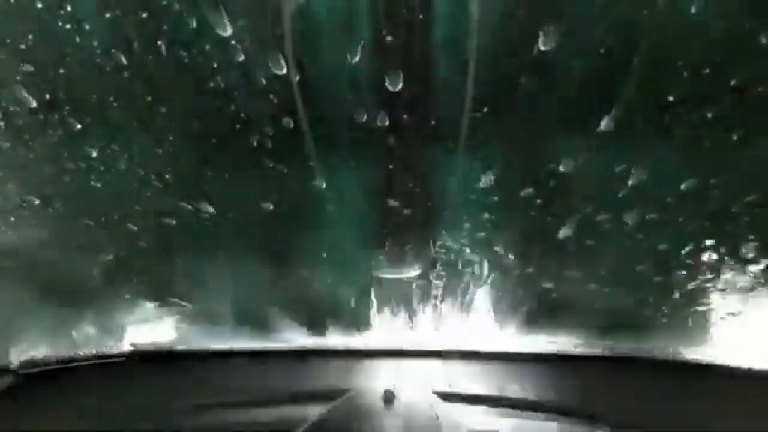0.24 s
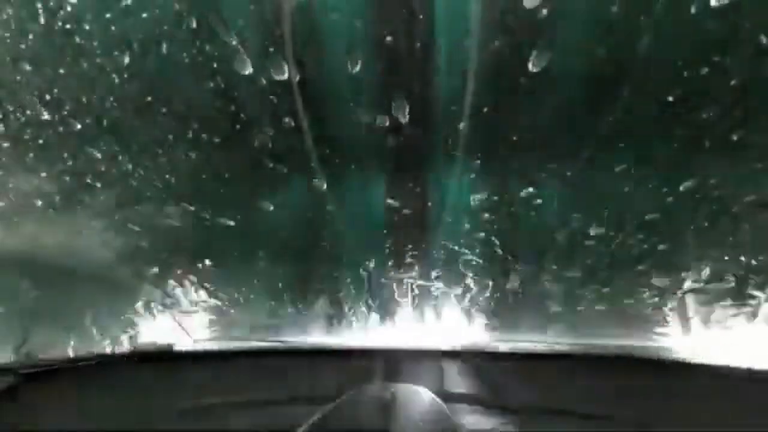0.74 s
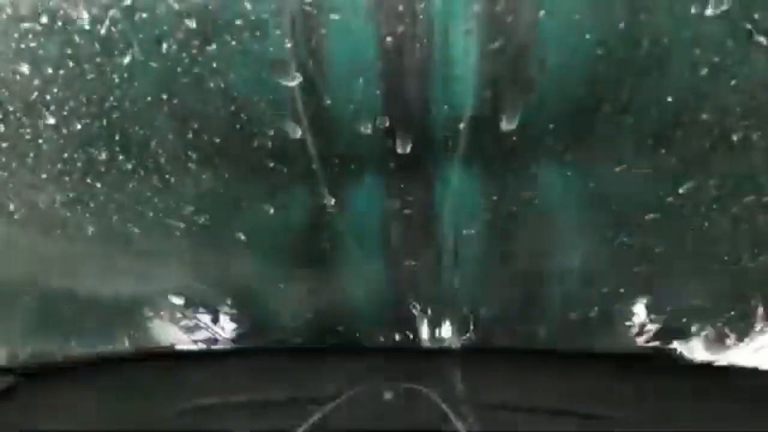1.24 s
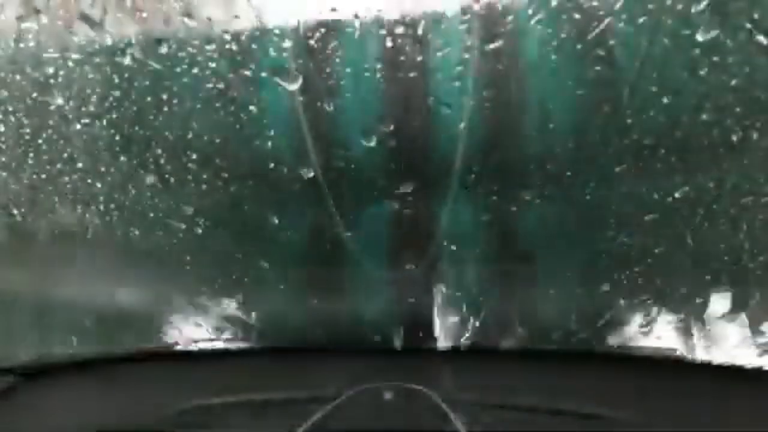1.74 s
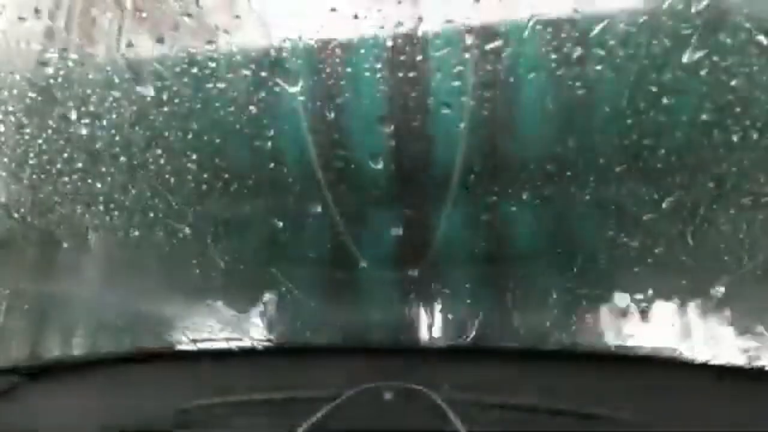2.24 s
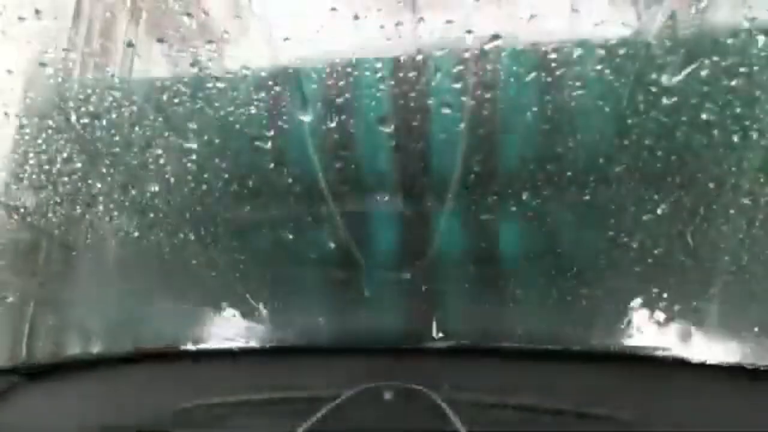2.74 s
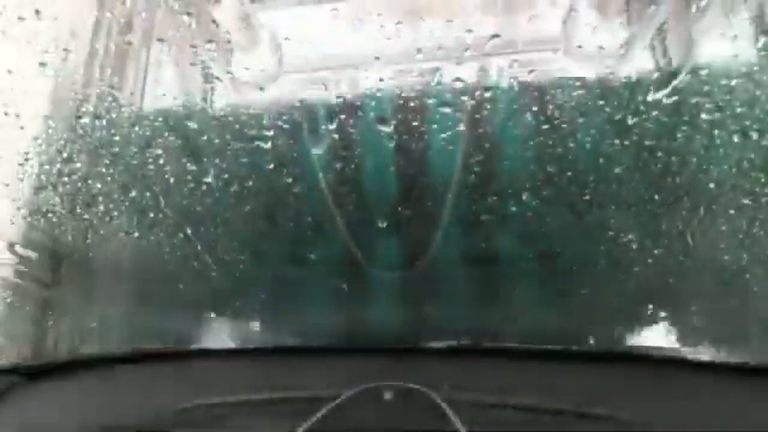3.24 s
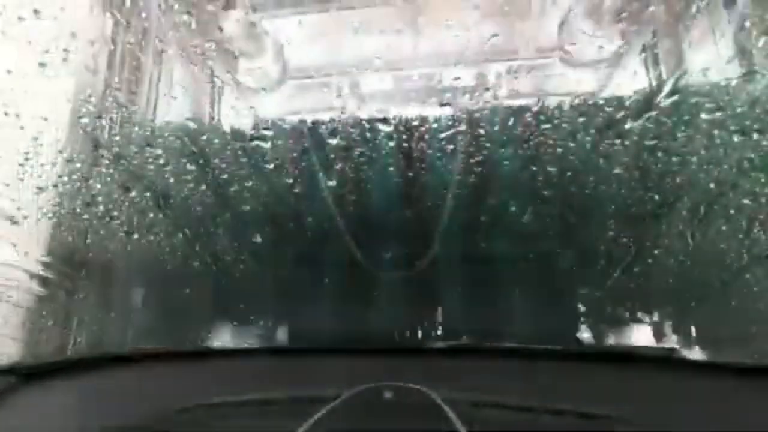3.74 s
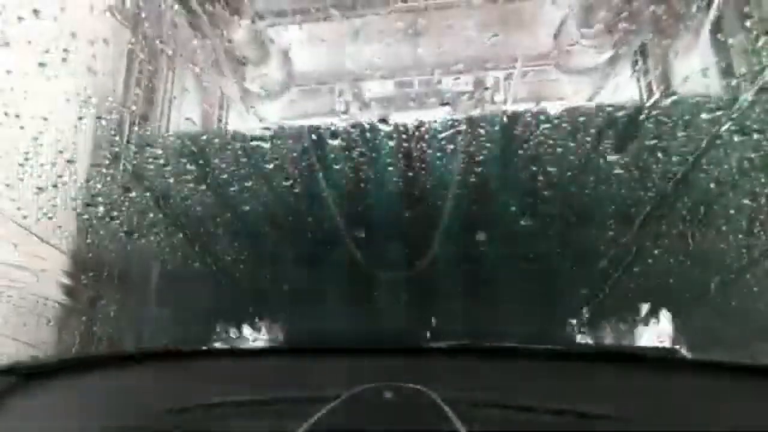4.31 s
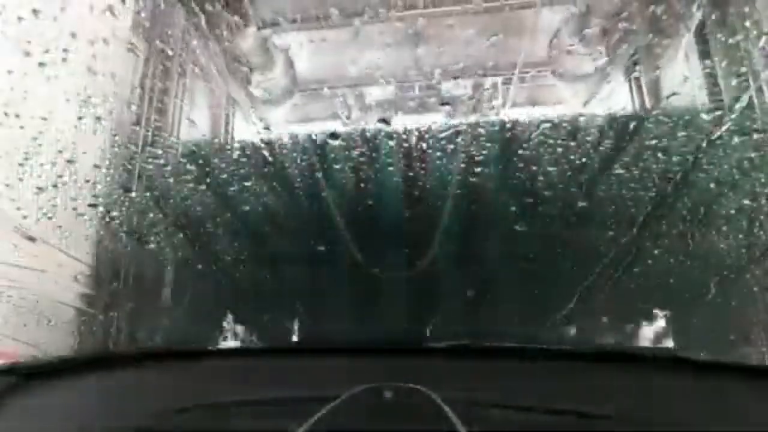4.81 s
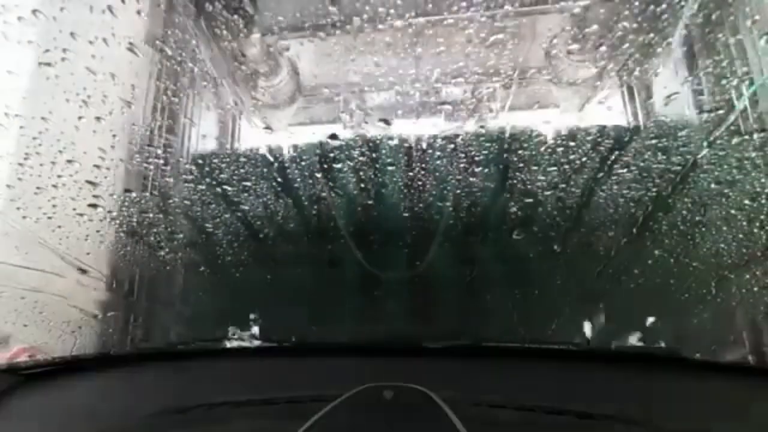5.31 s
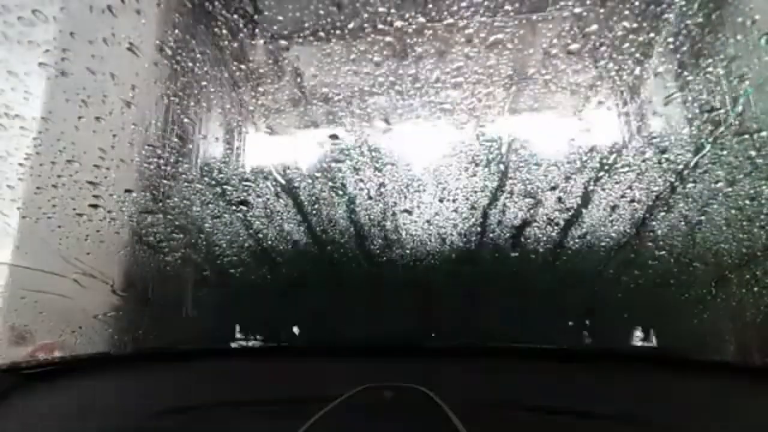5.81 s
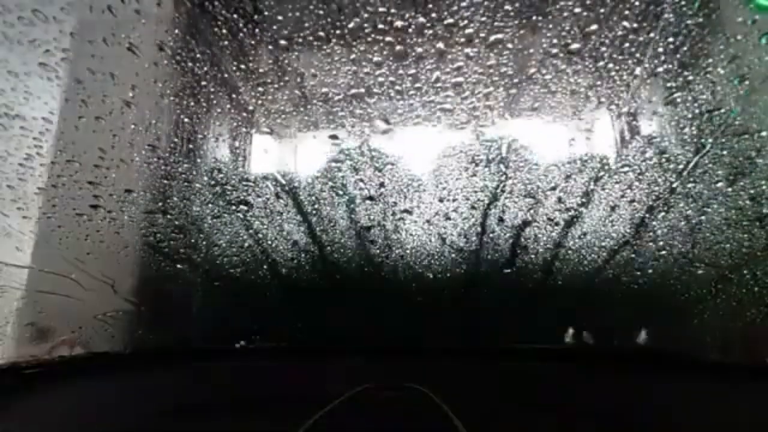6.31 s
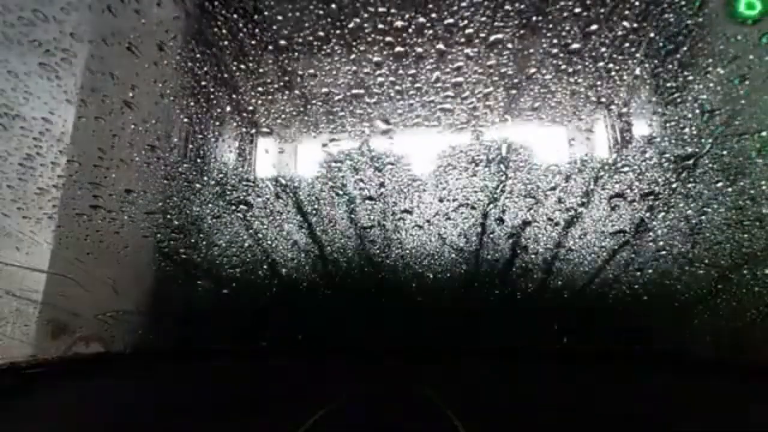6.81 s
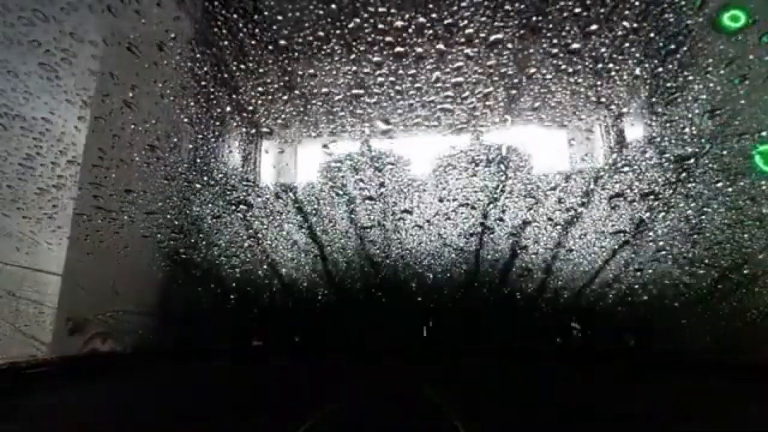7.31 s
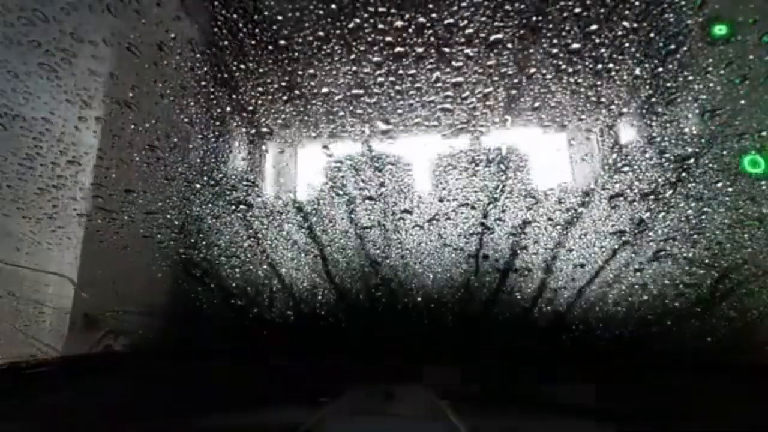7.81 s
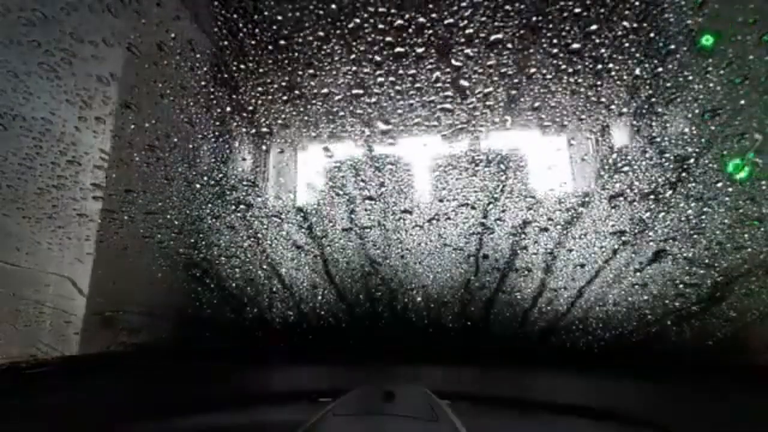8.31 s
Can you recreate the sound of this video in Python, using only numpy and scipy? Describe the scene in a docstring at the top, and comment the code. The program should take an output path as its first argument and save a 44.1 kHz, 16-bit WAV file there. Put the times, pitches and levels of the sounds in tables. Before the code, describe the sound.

Inside a closed car in an automatic wash, a big brush drums and booms on the roof, water spatters the windscreen, then everything recedes into dull rumbles.

```python
"""Drumming on the roof and a deep boom come first: an automatic car wash heard from inside the closed car.
A spinning cloth brush (random slaps and drag driving resonators and filters) beats the roof in two waves.
Water on the windscreen (showers of short noise bursts) thins to a patter as the brush moves to the rear.
The cabin boom and muffled scrubbing (filtered noise) remain and swell twice more; late on, a distant water
jet opens as a rush of filtered noise."""
import sys
import numpy as np
from scipy import signal
from scipy.fft import rfft, irfft, next_fast_len
from scipy.io import wavfile
from scipy.ndimage import uniform_filter1d

SR = 44100
rng = np.random.default_rng(int(sys.argv[2]) if len(sys.argv) > 2 else 0)


def transcribe(u):
    """Save the signal u as a 16-bit wav file named by the first command-line argument.

    u: samples, shape (n,) or (channels, n), limited to [-1, 1]; the rate is SR.
    q: integer samples, one column per channel.
    """
    v = np.clip(np.atleast_2d(u).T, -1, 1)
    q = np.round(v * 32767).astype(np.int16)
    wavfile.write(sys.argv[1], SR, q)


N = 377044


def from_db(db):
    """Logarithmic level: 20 dB is a factor of ten in amplitude."""
    return 10 ** (np.asarray(db) / 20)


def rms_one(x):
    """Normalisation: scale to unit mean power."""
    return x / np.sqrt(np.mean(x ** 2) + 1e-20)


def in_time(rows):
    """Linear interpolation: each column of a curve, after its times, at every sample."""
    s, *columns = np.transpose(rows)
    return [np.interp(np.arange(N) / SR, s, column) for column in columns]


def at_hz(points, hz):
    """Logarithmic frequency scale: interpolate a two-column table along octaves."""
    f, values = np.array(points).T
    return np.interp(np.log(np.maximum(hz, 1)), np.log(f), values)


def drift(rate):
    """Low-pass noise: slow chance of unit spread, through two poles with corners at rate (Hz)."""
    step = 40   # samples between slow values
    settle = 2000   # slow values dropped while the filter settles
    r = np.exp(-2 * np.pi * rate * step / SR)
    noise = rng.standard_normal(N // step + 2 + settle)
    slow = signal.lfilter([1], [1, -2 * r, r * r], noise)[settle:]
    return np.interp(np.arange(N) / step, np.arange(len(slow)), rms_one(slow))


def coloured(x, spectrum):
    """Minimum-phase filtering: impose a spectrum, falling 30 dB an octave above its last point; rms 1."""
    size = 2 ** 14
    hz = np.arange(size // 2 + 1) * SR / size
    octaves_above = np.log2(np.clip(hz / spectrum[-1][0], 1, 8))
    db = at_hz(spectrum, hz) - 30 * octaves_above
    # folding the cepstrum onto positive times makes the response causal
    cepstrum = irfft(np.log(from_db(db)))
    cepstrum[1:size // 2] *= 2
    cepstrum[size // 2 + 1:] = 0
    response = irfft(np.exp(rfft(cepstrum)))
    return rms_one(signal.fftconvolve(x, response[None], axes=1)[:, :N])


def resonate(x, modes, wander_db):
    """Modal superposition: panel modes in parallel, each varying as the contact point moves; rms 1."""
    out = 0
    for hz, width_hz, db in modes:
        r = np.exp(-np.pi * width_hz / SR)
        ring = signal.lfilter([1, 0, -1], [1, -2 * r * np.cos(2 * np.pi * hz / SR), r * r], x)
        peak_one = (1 - r * r) / 2 * ring   # unit gain at resonance
        out = out + from_db(db + wander_db * drift(5.3)) * peak_one
    return rms_one(out)


# Stereo width and lean by frequency [f/Hz, side to mid level/dB, left minus right level/dB]
STEREO_WIDTH = [(150, -30, -.5), (350, -42, 0), (750, -35, 0), (1100, -19, -.2), (2400, -11, -.6),
                (4800, -6, -.8), (8000, -2, 1.6)]


def spread(pair):
    """Stereo mixing: two unrelated signals become nearly mono below 1 kHz, wide in the treble."""
    size = next_fast_len(N)
    mid, side = rfft(pair, size)
    hz, table = np.arange(len(mid)) * SR / size, np.array(STEREO_WIDTH)
    width = from_db(at_hz(table[:, :2], hz))
    lean_db = at_hz(table[:, ::2], hz)
    sign = np.array([[1], [-1]])   # left, right
    stereo = (mid + sign * width * side) / np.hypot(1, width)
    return irfft(stereo * from_db(sign * lean_db / 2), size)[:, :N]


def evened(x, span_s):
    """Power levelling: divide by the running rms, smoothed twice over the span."""
    size = max(int(span_s * SR), 2)
    power = uniform_filter1d(uniform_filter1d(np.mean(x ** 2, axis=0), size), size)
    return x / np.sqrt(np.abs(power) + 1e-9)


def impacts(per_s, spread_db):
    """Shot noise: independent random clicks of either sign and uneven size."""
    sizes = from_db(spread_db * np.minimum(rng.exponential(1, N), 4))
    return sizes * rng.choice([-1, 1], N) * (rng.random(N) < per_s / SR)


def slaps(per_s, spread_db, drag):
    """Impact and friction: random clicks for slapping cloth strips, steady noise for their drag."""
    hits = rms_one(np.array([impacts(per_s, spread_db) for _ in range(2)]))
    return spread(hits + drag * rng.standard_normal((2, N)))


def splash(hz, t60, cabin_db, cabin_t60, rise_s=0.00087, width=.3):
    """Transient and reverberation: a drop flattens in a short noise crack, then its reflections decay."""
    t = np.arange(SR // 20) / SR
    direct = from_db(-60 * t / t60)
    reflected = from_db(cabin_db - 60 * t / cabin_t60)
    envelope = (direct + reflected) * (1 - np.exp(-t / rise_s))
    edges = np.minimum([hz / (1 + width), hz * (1 + width)], [.4 * SR, .45 * SR])
    band = signal.butter(2, edges, "band", fs=SR, output="sos")
    return signal.sosfilt(band, envelope * rng.standard_normal((2, len(t))))


BRUSH_TURN_HZ, BEAT_REFERENCE_S = 6.55, 0.047   # turning rate; instant from which beats are lagged


def throb(share, roof_db, roof_lag_s, rear_db, rear_lag_s):
    """Amplitude modulation: the cloth beats harder once a turn, at differing phases on roof and rear."""
    t = np.arange(N) / SR - BEAT_REFERENCE_S
    roof = np.cos(2 * np.pi * BRUSH_TURN_HZ * (t - roof_lag_s))
    rear = np.cos(2 * np.pi * BRUSH_TURN_HZ * (t - rear_lag_s))
    return from_db(share * roof_db * roof + (1 - share) * rear_db * rear)


# Brief level changes of the brush noise, up or down [t/s, boom level/dB, drumming level/dB, scrub level/dB]
BRIEF_CHANGES = [(0.08, 10.5, 2, 1.5), (0.48, -4.5, 3.5, 1.5), (0.68, -2, 6.5, -2.5), (0.79, 5.5, 7.5, -1),
                 (1.41, 4, -2, -1), (1.56, 8.5, -2.5, -1.5), (2.37, 7, -1.5, 1.5), (3.92, -12, 5, -1),
                 (6.48, -4, 6, 1)]
CHANGE_ONSET_S, CHANGE_RETURN_S = 0.033, 0.058   # Gaussian time constants


def brief_changes():
    """Level modulation: boom, drumming and scrub briefly rise or dip (in dB) around each instant."""
    t, change_db = np.arange(N) / SR, 0
    for s, *peaks_db in BRIEF_CHANGES:
        pulse = np.exp(-((t - s) / np.where(t < s, CHANGE_ONSET_S, CHANGE_RETURN_S)) ** 2)
        change_db = change_db + np.outer(peaks_db, pulse)
    return change_db


# Higher air mode, as the brush pushes in different places [t/s, level/dB against the deep boom]
UPPER_AIR_MODE = [(0, -8.5), (1.4, -9.5), (2.0, -5.5), (2.7, -13), (4.6, -15.5), (6, -6.5), (7.3, -11.5),
                  (7.7, 1), (8.55, -6)]
# Colour of the deep enclosed air [f/Hz, level/dB per Hz]
DEEP_AIR = [(15, -47), (30, -17), (38, -2.5), (44, 3.5), (52, 4.5), (59, -1), (72, -15.5), (95, -35)]


def boom(buffet_db, share):
    """Cavity resonance: the shaken shell makes the enclosed air boom, a little higher under roof blows."""
    upper_db, = in_time(UPPER_AIR_MODE)
    deep = coloured(slaps(per_s=300, spread_db=-0.5, drag=0.69), DEEP_AIR)
    roof = coloured(slaps(per_s=250, spread_db=3.5, drag=1.0), [(45, -36), (59, -2.5), (70, -21.0)])
    upper = coloured(spread(rng.standard_normal((2, N))), [(60, -15.5), (80, 0.5), (100, -12)])
    air = deep + from_db(-1.5) * np.sqrt(share) * roof + from_db(upper_db) * upper
    beat = throb(share, roof_db=0.5, roof_lag_s=0.0064, rear_db=0.1, rear_lag_s=0.035)
    return from_db(buffet_db - 3.0) * beat * evened(air, span_s=0.15)


# Low modes of the roof before colouring [f/Hz, width/Hz, level/dB]
ROOF_LOW_MODES = [(136.4, 13, -6), (162.3, 6, -9.5), (191.7, 16, 2.5), (214.5, 13.7, -5),
                  (233.8, 8.5, -2.5), (261, 9.5, -9)]
# Colour of the rear and side panels [f/Hz, level/dB per Hz]
SIDE_COLOUR = [(85, -5.5), (105, 1.5), (180, 1.5), (205, -14), (238, 0.5), (285, -12.5), (360, -18)]


def panels(beating_db, share):
    """Forced plate vibration: slaps drum on the roof's low modes, later more dully on rear and sides."""
    reach = share / (share + 0.026)   # the low modes are shaken from further away
    force = slaps(per_s=300, spread_db=1.0, drag=0.77)
    skin = resonate(force, ROOF_LOW_MODES, wander_db=2.0)
    skin = coloured(skin, [(80, -17.5), (120, 3.5), (265, 0.0), (305, -18.5)])
    sides = coloured(slaps(per_s=300, spread_db=4, drag=0.79), SIDE_COLOUR)
    drum = evened(np.sqrt(reach) * skin + np.sqrt(1 - reach) * sides, span_s=0.11)
    beat = throb(share, roof_db=1.7, roof_lag_s=-.005, rear_db=1.0, rear_lag_s=0.075)
    return from_db(beating_db - 4.0) * beat * drum


# Wet cloth dragged over the car, before trim [t/s, scrub level/dB, swish level/dB]
CLOTH_DRAG = [(0, -25.5, -33), (0.52, -27, -38.5), (0.75, -30, -46), (1.0, -32, -45.5), (1.09, -27, -40),
              (1.25, -28.5, -43.5), (1.88, -31, -44), (1.98, -36, -45), (2.5, -40, -47), (3.1, -39, -49.5),
              (3.3, -36.5, -46), (4.7, -41.5, -54), (5.1, -44, -57.5), (5.7, -46, -55),
              (6.25, -41.5, -52.5), (6.8, -46.5, -55), (7.4, -49, -59), (7.64, -45.5, -57),
              (7.72, -42.5, -55), (7.92, -40, -53), (8.55, -44, -54.5)]
# Roof modes in 440-680 Hz fade as the brush moves back [t/s, change of level/dB]
LOW_RING_FADE = [(0.8, 0), (1.8, -4), (2.2, -5.5)]
# Higher modes of the roof sheet, before colouring [f/Hz, width/Hz, level/dB]
ROOF_SHEET_MODES = [(356, 38, -7), (431, 37, -13), (490.7, 6.8, 4.5), (510, 31, -1), (584, 13, -15),
                    (611, 15, 4.5), (755, 36, -8.5), (869, 25, -6.5), (980, 32, -5.5), (1019, 15.6, -2),
                    (1129, 31, -6), (1237, 16, -9), (1430, 25, -6.5), (1530, 5.8, -11), (1663, 10.5, -6.5),
                    (2050, 76, -7.5), (2350, 14, 3.5)]
# Modes of the rear panels, before colouring [f/Hz, width/Hz, level/dB]
REAR_PANEL_MODES = [(328, 30, -1), (405.4, 26, 2.5), (494.6, 52, 2), (563, 14, -2.5), (632, 22, -1),
                    (727, 15, -2), (810, 33, -10), (1180, 37, -10), (1278, 27, -11.5), (1620, 52, -12)]
# Colour of the scrubbing rush [f/Hz, level/dB per Hz]
SCRUB_COLOUR = [(240, -12), (310, -1), (580, -2.5), (770, -5), (900, -13.5), (1300, -13), (1650, -17.5),
                (1900, -20.5)]
# Colour of the wet swish [f/Hz, level/dB per Hz]
SWISH_COLOUR = [(1100, 1.5), (1800, -3.5), (2150, 1.5), (2500, 5.5), (2900, 0.5), (3400, -0.5), (4000, -9),
                (5200, -9.5), (6700, -17.5), (10000, -19), (11500, -26)]


def scrubbing(change_db, share):
    """Frictional excitation: strip tips ring the roof sheet, then rear panels with a rush, under a swish."""
    scrub_db, swish_db = in_time(CLOTH_DRAG)
    low_db, = in_time(LOW_RING_FADE)
    sheet = resonate(slaps(per_s=300, spread_db=0.5, drag=0.65), ROOF_SHEET_MODES, wander_db=2.0)
    sheet = coloured(sheet, [(290, -11), (350, 4.0), (1700, 1.0), (2300, -15.5), (2900, -24.0)])
    sheet = evened(sheet, span_s=0.062)
    low_band = signal.butter(1, [440, 680], "band", fs=SR, output="sos")
    sheet = sheet + (from_db(low_db) - 1) * signal.sosfilt(low_band, sheet)

    rush = coloured(slaps(per_s=1500, spread_db=1.5, drag=1.0), SCRUB_COLOUR)
    rear = resonate(slaps(per_s=700, spread_db=1.0, drag=0.8), REAR_PANEL_MODES, wander_db=1.5)
    rear = coloured(rear, [(150, -13.0), (280, 3.5), (1800, 0)])
    rear = evened(rush + from_db(-2.5) * rear, span_s=0.07)
    swish = coloured(slaps(per_s=1200, spread_db=3.5, drag=1.42), SWISH_COLOUR)

    beat = throb(share, roof_db=1.33, roof_lag_s=-0.019, rear_db=0.5, rear_lag_s=0.053)
    flutter = beat * from_db(1.16 * drift(18.3))   # strips arrive in uneven bunches
    contact = np.sqrt(share) * sheet + np.sqrt(1 - share) * rear
    scrub = from_db(scrub_db + change_db - 1.5) * contact
    return flutter * (scrub + from_db(swish_db - 1.5) * swish)


# Water flung on the windscreen, before trim and final fade [t/s, level/dB]
WINDSCREEN_WATER = [(0.0, -39), (0.28, -56), (0.47, -47), (0.85, -52.5), (1.15, -50.5), (1.8, -47),
                    (2.05, -51.5), (3.35, -50.5)]
# Colour of the struck glass [f/Hz, level/dB per Hz]
GLASS_COLOUR = [(1500, -11.5), (2600, 11), (4000, -1), (5200, 2), (6800, -3.5), (10000, -2), (12500, -10.5),
                (14500, -9)]
# downpour to patter: rates before clumping, and time constant
FIRST_DROPS_PER_S, LAST_DROPS_PER_S, THINNING_S = 1500, 200, 1.4
# the spray dies away once the brush has left the glass
SPRAY_END_S, SPRAY_FADE_DB_PER_S = 3.31, 16


def spray(share, count=16):
    """Poisson shower: clumped random drops of many sizes strike the glass, then die out."""
    t = np.arange(N) / SR
    spray_db, = in_time(WINDSCREEN_WATER)
    thinning = np.exp(-t / THINNING_S)
    per_s = LAST_DROPS_PER_S + (FIRST_DROPS_PER_S - LAST_DROPS_PER_S) * thinning
    per_s = per_s * from_db(2.6 * drift(25))   # clumps
    patter = 0
    for hz in np.geomspace(2000, 12500, count):
        drop = splash(hz, t60=0.005, cabin_db=-15, cabin_t60=0.1, width=0.3)
        drop = drop / np.sqrt(np.sum(drop ** 2)) * np.sqrt(hz / SR)   # equal power per Hz
        hits = impacts(per_s / count, spread_db=4.5)
        patter = patter + signal.oaconvolve(hits[None], drop, axes=1)[:, :N]
    # sparse fat drops crack over a wide range
    fat_drop = splash(4500, t60=0.006, cabin_db=-16, cabin_t60=0.08, width=1)
    fat = signal.oaconvolve(impacts(per_s=60, spread_db=1)[None], fat_drop, axes=1)[:, :N]
    drops = spread(rms_one(patter) + .5 * rms_one(fat))
    patter = evened(coloured(drops, GLASS_COLOUR), span_s=0.57)
    fade_db = SPRAY_FADE_DB_PER_S * np.maximum(t - SPRAY_END_S, 0)
    beat = throb(share, roof_db=0.4, roof_lag_s=-.01, rear_db=-0.5, rear_lag_s=0.079)
    return from_db(spray_db - fade_db + 0.85) * beat * patter


# Big drops on the glass, before trim [t/s, level/dB, f/Hz]
BIG_DROPS = [(0.113, -32.5, 3380), (.612, -29.5, 4260), (.947, -44, 5400), (1.305, -38, 5270),
             (1.43, -41, 8050), (1.704, -40, 3300), (1.725, -38, 4400), (1.881, -41, 4100),
             (1.898, -36.5, 3480), (1.919, -39, 4500), (2.037, -42, 4000), (2.175, -41, 3140),
             (2.196, -43, 5400), (2.298, -42.5, 7000), (2.420, -44.5, 8200), (2.52, -45, 4500),
             (2.654, -41.5, 5300), (2.681, -45, 4400), (2.779, -42, 8140), (2.836, -42.5, 8500),
             (2.844, -44, 4000), (2.91, -43.5, 3300), (2.999, -49, 4700), (3.13, -42.5, 5400),
             (3.179, -36, 3470), (3.188, -40.5, 3660), (3.269, -44, 3880), (3.365, -39.5, 5000),
             (3.442, -38, 3280), (3.458, -38, 4600), (3.618, -39, 4600), (3.625, -42, 6900),
             (3.902, -42, 5700), (4.051, -48, 10500), (4.19, -54, 4800), (4.245, -54, 10500),
             (4.267, -47, 4460), (4.325, -51, 6800), (4.422, -49.5, 8000), (4.486, -56, 5500),
             (4.592, -46, 7060), (4.868, -59, 10500), (7.079, -57, 2600)]
PANE_HZ, PANE_KNOCK_DB = 2400, 3   # pitch of the knock; its level against a crack at that pitch


def splats(count=3):
    """Impact on a plate: big drops crack at a pitch, knock the pane and burst into later droplets."""
    out = np.zeros((2, N + SR))
    for s, level_db, hz in BIG_DROPS:
        crack = (s, level_db, hz, 0.013, 0.35)
        # duller than the crack, and weaker for the small high drops
        knock_db = level_db + PANE_KNOCK_DB - 20 * np.log10(hz / PANE_HZ)
        knock = (s, knock_db, PANE_HZ, 0.035, 0.7)
        # within 18 ms and half an octave of the crack
        droplets = [(s + .018 * late, level_db - 13.5, hz * 2 ** (size - .5), 0.013, 0.35)
                    for late, size in rng.random((count, 2))]
        for when, db, pitch_hz, t60, width in [crack, knock] + droplets:
            drop = splash(pitch_hz, t60, cabin_db=-16, cabin_t60=0.08, rise_s=0.0003, width=width)
            at = max(int(when * SR), 0)
            out[:, at:at + drop.shape[1]] += from_db(db - 14) * rms_one(drop)
    glass = signal.butter(4, 11800, fs=SR, output="sos")
    return signal.sosfilt(glass, spread(out[:, :N]))


# Single strips smack the roof, before trim [t/s, level/dB, f/Hz of the crack]
STRIP_SMACKS = [(0.666, -26.5, 507), (0.762, -29.5, 550), (2.644, -39, 855), (2.679, -39.5, 960),
                (4.682, -44, 735)]


def smacks():
    """Impulse response: a flat wet strip cracks dully; roof modes near its pitch ring on, damped by cloth."""
    out, t = np.zeros(N + SR), np.arange(SR // 8) / SR
    for s, level_db, crack_hz in STRIP_SMACKS:
        ring = 0
        for hz, width_hz, db in ROOF_SHEET_MODES:
            octaves_off = abs(np.log2(hz / crack_hz))
            cloth_damped = from_db(db - 12 * octaves_off - 60 * t / 0.14)
            decay = cloth_damped * np.exp(-np.pi * width_hz * t)
            ring = ring + decay * np.sin(2 * np.pi * hz * t) * rng.choice([-1, 1])
        crack = splash(crack_hz, t60=0.025, cabin_db=-16, cabin_t60=0.08, width=0.6)[0]
        at = int(s * SR)
        out[at:at + len(t)] += from_db(level_db - 11) * rms_one(ring)
        out[at:at + len(crack)] += from_db(level_db - 10) * rms_one(crack)
    return out[:N]


# Colour of the water jet [f/Hz, level/dB per Hz]
JET_COLOUR = [(400, -10), (650, 2), (950, -11), (1300, 2.5), (1650, -1), (1950, -9), (2550, -3),
              (3300, -13)]
# the jet opens on the far end of the car, then eases off
JET_OPENS_S, JET_RISE_S, JET_DB, JET_SAG_DB_PER_S = 7.62, 0.068, -49.5, 7.5


def jet():
    """Broadband flow noise: fine spray rushes on distant bodywork."""
    since = np.maximum(np.arange(N) / SR - JET_OPENS_S, 0)
    flow = np.minimum(since / JET_RISE_S, 1) * from_db(JET_DB - JET_SAG_DB_PER_S * since)
    return flow * coloured(spread(rng.standard_normal((2, N))), JET_COLOUR)


# Where the brush works [t/s, share of its power that goes into the roof 0-1]
ROOF_SHARE = [(0, 0.95), (1.85, 0.79), (2.1, 0.62), (2.6, 0.1), (4.3, 0.03), (5, 0)]
# Push of the brushes, before brief changes and trim [t/s, shell buffeting level/dB, panel beating level/dB]
BRUSH_PUSH = [(0, -22, -14.5), (0.55, -13, -17), (0.75, -26, -28), (1.0, -24.5, -22), (1.3, -14, -10),
              (1.7, -25, -17.5), (2.0, -24.5, -28.5), (2.35, -33, -30), (2.55, -38.5, -36.5),
              (3.4, -32, -33.5), (4.35, -31.5, -36.5), (5.3, -37.5, -41), (5.9, -27.5, -38),
              (6.35, -25.5, -36), (6.7, -31, -40), (7.45, -34.5, -42), (8.25, -23.5, -37.5),
              (8.55, -29, -41)]


def scene():
    """Linear superposition: brush and water sounds add at the front seat."""
    share = np.clip(in_time(ROOF_SHARE)[0], 0, 1)
    buffet_db, beating_db = in_time(BRUSH_PUSH)
    boom_db, drum_db, scrub_db = brief_changes()
    brush = boom(buffet_db + boom_db, share) + panels(beating_db + drum_db, share)
    brush = brush + scrubbing(scrub_db, share)
    return brush + smacks() + jet() + spray(share) + splats()


def record(dry):
    """Low-pass filtering: a steep elliptic cut removes the treble above 15 kHz."""
    top_cut = signal.ellip(10, .1, 80, 15000, fs=SR, output="sos")
    return signal.sosfilt(top_cut, dry)


dry = scene()
out = record(dry)
transcribe(out)
```